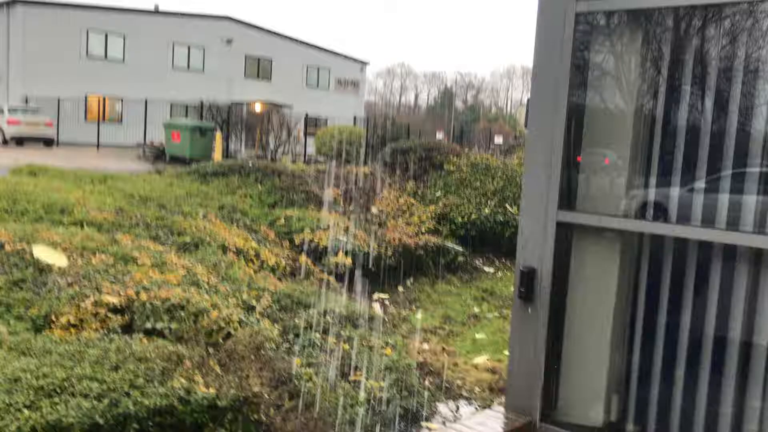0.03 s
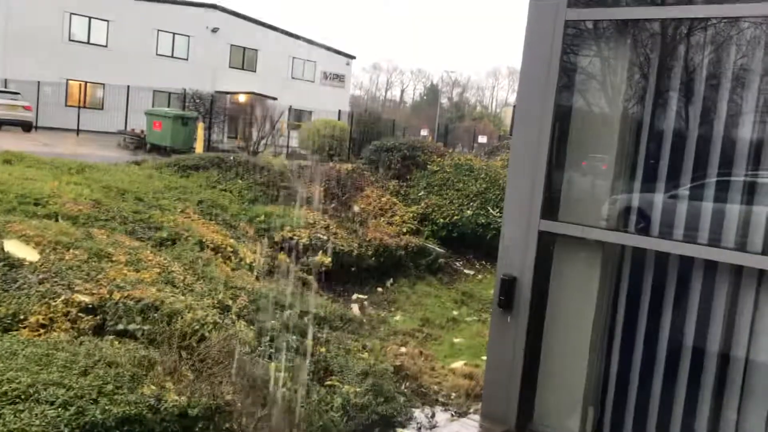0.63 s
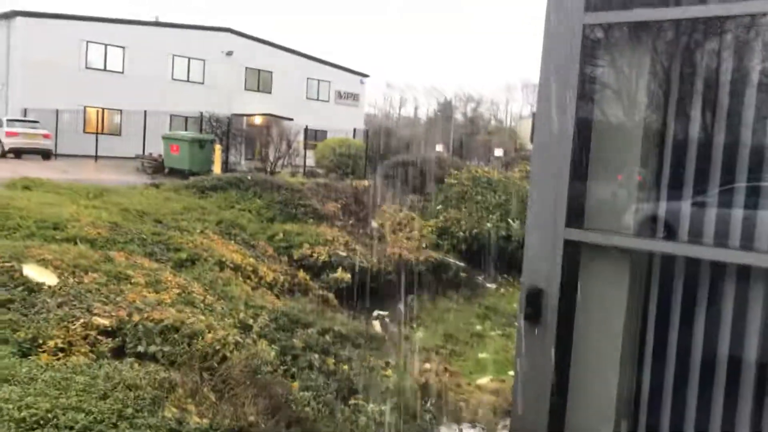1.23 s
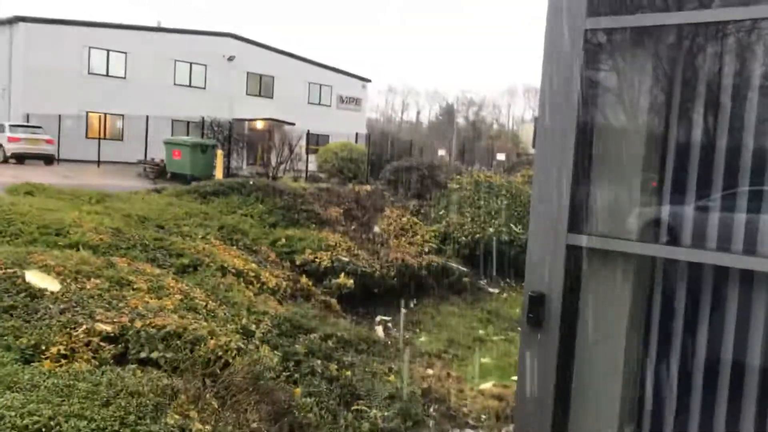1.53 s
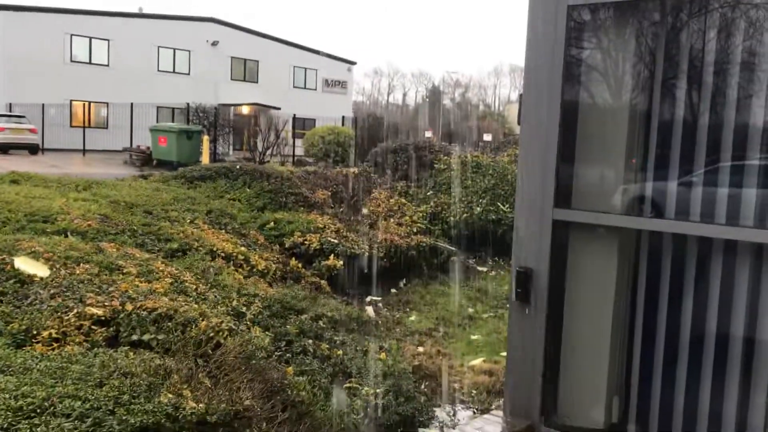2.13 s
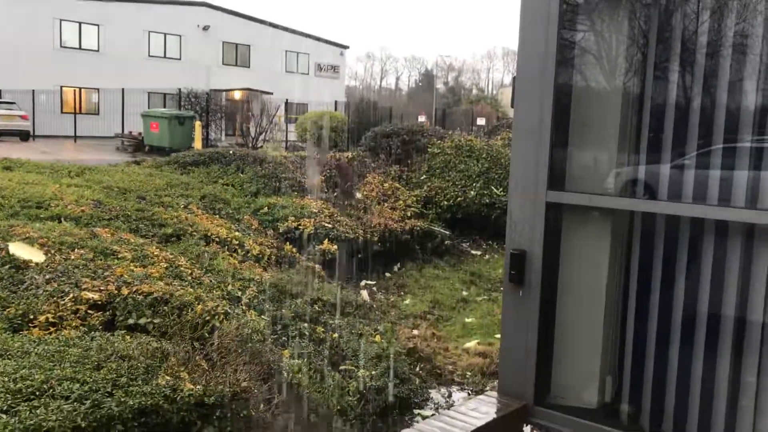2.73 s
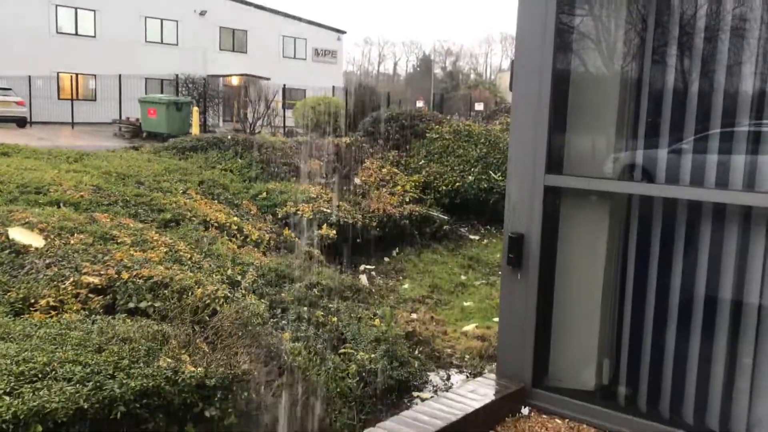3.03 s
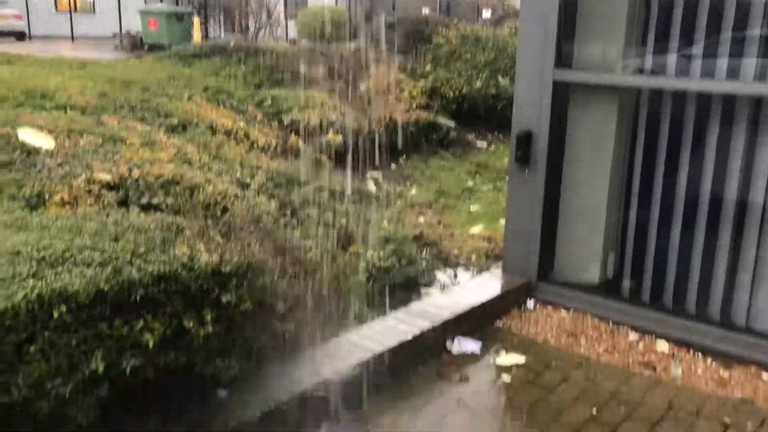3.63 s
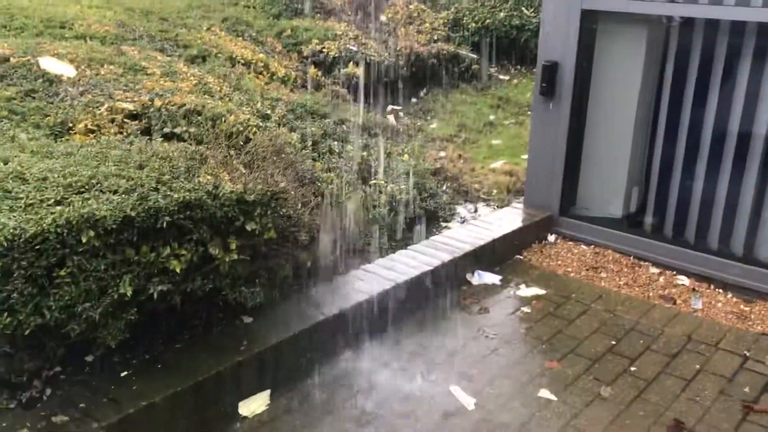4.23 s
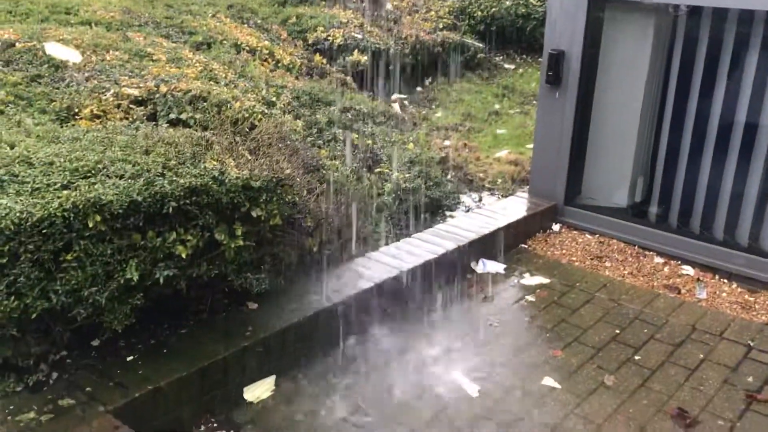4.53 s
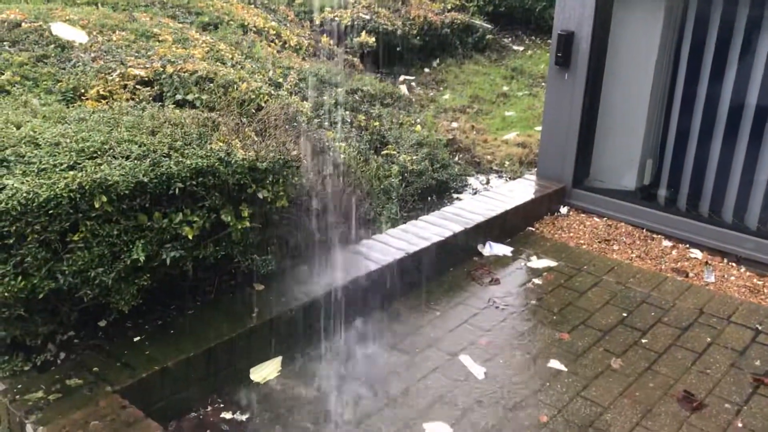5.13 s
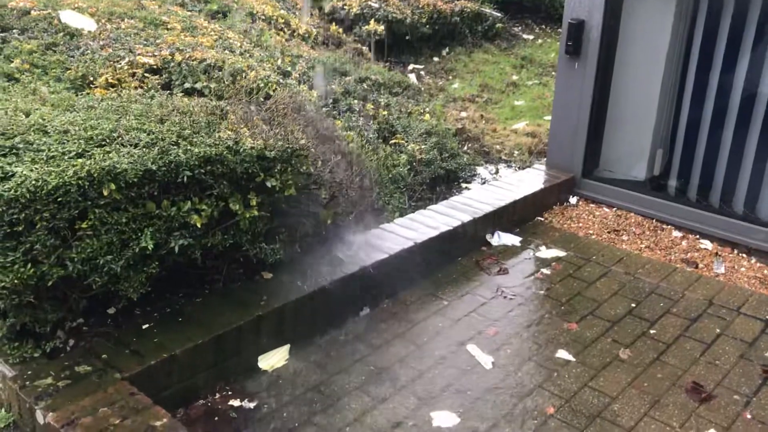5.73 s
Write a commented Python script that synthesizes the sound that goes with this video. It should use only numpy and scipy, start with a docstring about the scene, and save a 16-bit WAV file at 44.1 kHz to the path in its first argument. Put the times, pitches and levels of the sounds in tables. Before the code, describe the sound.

Rainwater spills from an overflowing gutter and splatters on wet paving close to the microphone. Big blobs slap sharply, smaller drops patter in uneven clumps, and fine spray sizzles, with small bubbles plinking in a puddle. A nearby door and wall add a short echo. Steady rain, far traffic and a faint machine hum lie behind. Two soft puffs of wind touch the microphone early on.

```python
"""Rainwater spills from an overflowing gutter onto wet paving beside a glass door.
Big blobs slap, smaller drops patter in clumps, their spray sizzles; door and wall throw it back.
Bubbles ring in the puddle. Behind: steady rain, far traffic, a faint machine hum,
and two early puffs of wind on the microphone."""
import sys
import numpy as np
from scipy import signal
from scipy.fft import rfft, irfft, next_fast_len
from scipy.io import wavfile
from scipy.ndimage import map_coordinates

SR = 44100
rng = np.random.default_rng(int(sys.argv[2]) if len(sys.argv) > 2 else 0)


def transcribe(signal):
    """Save signal, clipped to [-1, 1], as a 16-bit WAV file at the path in sys.argv[1]."""
    frames = np.atleast_2d(signal).T
    limited = np.clip(frames, -1, 1)
    pcm = np.round(limited * 32767).astype(np.int16)
    wavfile.write(sys.argv[1], SR, pcm)


N = 254456

# Gutter flow. Each row: time in seconds, relative spray level in dB.
FLOW = [(.13, -30.5), (.34, -29), (.48, -34.5), (.75, -35), (1.05, -32), (1.5, -31.5), (2.0, -29.5),
        (2.4, -29), (3.08, -31), (3.22, -27.5), (3.75, -29), (4.03, -27.5), (4.15, -29), (4.35, -26.5),
        (4.53, -30), (4.75, -29.5), (5.3, -29.5), (5.77, -34)]
# Thick gushes. Each row: centre in seconds, half length in seconds, patter level in dB.
GUSHES = [(0.872, .06, -36), (1.18, 0.077, -33), (1.475, .025, -31), (1.68, 0.084, -30),
          (1.815, .06, -26.5), (2.067, .06, -30), (2.584, 0.15, -33), (2.93, 0.088, -31),
          (3.223, 0.056, -31.5), (3.36, 0.041, -29.5), (3.8, .17, -36), (4.272, 0.055, -37),
          (4.7, 0.12, -34.5), (5.118, 0.072, -31), (5.412, .03, -33.5)]
# Spectra of finest spray, rain, traffic and wind. Each row: frequency in Hz, relative density in dB.
MIST_SPECTRUM = [(800, -31), (2500, -11), (4500, 4), (6300, 3), (9000, 1), (12500, 2.5), (16000, 2)]
RAIN_SPECTRUM = [(150, -14), (450, -5.5), (650, 0.5), (1000, 1.5), (2000, 0.5), (4000, -5.5), (9000, -7),
                 (16000, -12.5)]
TRAFFIC_SPECTRUM = [(26, -33), (38, -7.5), (60, 0), (85, -5.5), (110, -3), (170, -5), (300, -9), (450, -16),
                    (900, -26.5), (3000, -53)]
WIND_SPECTRUM = [(20, -14), (38, -3), (75, -2), (130, -13), (250, -24), (600, -47)]
# Traffic tones. Each row: centre in seconds, half length in seconds, pitch in Hz, rms level in dB.
DRONES = [(1.7, 0.39, 105, -52), (3.04, 0.59, 66, -50.5), (2.99, 0.11, 360, -54.5), (3.5, 0.21, 117, -52.5),
          (5.3, 0.33, 67, -50.5)]
# Machine tones. Each row: pitch in Hz, mean rms level in dB, wander in Hz.
HUM_TONES = [(63.7, -64, 3.7), (579.5, -59, 0.92)]
# Biggest blobs. Each row: start in seconds, relative level in dB, nominal band centre in Hz.
BIG_BLOBS = [(.1507, -18, 8400), (.4133, -15.5, 6900), (.556, -19.5, 6840), (.7583, -11, 4900),
             (.8258, -12.5, 4970), (.8762, -10, 5700), (.8912, -13.5, 5540), (.9314, -9, 4900),
             (1.0733, -18, 7100), (1.1312, -16.5, 7500), (1.2212, -10, 6240), (1.3598, -14.5, 10700),
             (1.6792, -8, 9400), (1.7881, -11, 6000), (1.8317, -13, 6000), (1.9658, -17, 5400),
             (2.195, -6, 5430), (2.3443, -15, 6750), (2.4997, -12.5, 5850), (2.6478, -9.5, 5630),
             (2.7644, -13, 9700), (2.8181, -14, 4360), (2.946, -8, 4000), (2.9963, -14.5, 3380),
             (3.399, -12, 4470), (3.6005, -11, 7200), (3.6674, -15, 4550), (4.006, -14, 7500),
             (4.0248, -11.5, 6950), (4.0364, -9.5, 6500), (4.1304, -11, 7100), (4.1566, -16, 5170),
             (4.3487, -12, 6900), (4.411, -13, 8200), (4.5767, -12.5, 5100), (4.611, -13, 6300),
             (4.6704, -9, 7700), (4.7761, -9.5, 6000), (4.9073, -10.5, 5430), (5.0018, -16.5, 7350),
             (5.4748, -15, 7700), (5.5245, -8, 5900), (5.589, -11, 5700), (5.636, -12.5, 4950),
             (5.6564, -14, 9650), (5.7532, -15, 6200)]
# Single bubbles. Each row: start in seconds, peak level in dB, starting pitch in Hz.
PLOPS = [(0.239, -21, 3600), (0.514, -16.5, 4100), (2.574, -23, 2980), (4.911, -36, 700), (4.914, -30, 975),
         (5.001, -18.5, 2580), (5.421, -41, 530)]
# Wind puffs. Each row: centre in seconds, half length in seconds, level in dB.
PUFFS = [(0.332, 0.082, -35.5), (0.708, .13, -43.5)]
# Door and wall echoes. Each row: mean delay in seconds, gain in dB.
ECHOES = [(.0064, -12.5), (.0078, -10), (0.0124, -35)]
# Dips in the microphone's response. Each row: centre in Hz, width in Hz, depth in dB.
MIC_DIPS = [(2030, 260, 2), (4940, 274, 3), (7780, 250, 3), (10390, 305, 4)]

USUAL_FLOW_DB, PATTER_DB, PATTER_DB_PER_FLOW_DB = -29.5, -38.7, 1.2
BLOB_BOOST_DB, BLOB_SCATTER_DB, BLOB_NOMINAL_HZ, BLOB_LOG_SPREAD = 12, 1.2, 6900, 0.19
CROWN_DB, CROWN_DECAY_S = -16.5, 0.0058
MIC_OPEN_S, MIC_TOP_HZ = .12, 15800


def amp(db):
    """Decibels to gain."""
    return 10 ** (np.asarray(db) / 20)


def unit(x):
    """Scale to rms 1."""
    return x / np.sqrt(np.mean(x ** 2) + 1e-20)


def wobble(rate_hz):
    """Smooth random curve."""
    knots = rng.standard_normal(int(N * rate_hz / SR) + 4)
    return map_coordinates(knots, [np.arange(N) * rate_hz / SR])


def swell(centre_s, half_s):
    """Flat-topped rise and fall in gain."""
    return np.exp(-.5 * ((np.arange(N) / SR - centre_s) / half_s) ** 4)


def filtered(x, response):
    """Apply a gain given as a function of Hz."""
    size = next_fast_len(N + SR // 4)
    return irfft(rfft(x, size) * response(np.fft.rfftfreq(size, 1 / SR)), size)[:N]


def noise(spectrum):
    """Shaped noise, rms 1."""
    knots_hz, db = np.transpose(spectrum)
    response = lambda hz: amp(np.interp(np.log(hz + 1), np.log(knots_hz), db))
    return unit(filtered(rng.standard_normal(N), response))


def tone(hz, wander_hz):
    """Wavering sine, rms 1."""
    return np.sqrt(2) * np.sin(2 * np.pi * np.cumsum(hz + wander_hz * wobble(14)) / SR)


def place(starts_s, sounds):
    """Sum one sound per row, each at its start."""
    at = np.round(np.abs(starts_s) * SR).astype(int)[:, None] + np.arange(sounds.shape[1])
    return np.bincount(at.ravel(), sounds.ravel(), N)[:N]


def flow_db(times_s):
    """Gutter flow, as relative spray level."""
    return np.interp(times_s, *np.transpose(FLOW))


def pour():
    """Heavy-drop gain: grows faster than the flow; each gush adds its power."""
    steady = amp(PATTER_DB + PATTER_DB_PER_FLOW_DB * (flow_db(np.arange(N) / SR) - USUAL_FLOW_DB))
    gush_power = sum((amp(db) * swell(centre_s, half_s)) ** 2 for centre_s, half_s, db in GUSHES)
    return np.sqrt(steady ** 2 + gush_power)


def impacts(centre_hz, decay_s, width, snap, size=256):
    """Water on stone: pressure spike plus tearing burst, in a band set by drop size."""
    t = np.arange(size) / SR
    shape = np.exp(0.19 * rng.standard_normal((len(centre_hz), 2)))  # no two drops flatten alike
    burst = rng.standard_normal((len(centre_hz), size)) * np.exp(-t / (decay_s * shape[:, :1]))
    burst[:, 0] += snap
    ratio = np.fft.rfftfreq(size, 1 / SR) / centre_hz[:, None]
    band = 1j * ratio / (1 - ratio ** 2 + 1j * ratio * width * shape[:, 1:])
    radiation = 1j * ratio / (0.29 + 1j * ratio)  # small source, little bass
    hits = irfft(rfft(burst) * band * radiation, size)
    return hits / np.linalg.norm(hits, axis=1, keepdims=True) * np.sqrt(SR / 1000)  # 1 ms at rms 1


def shower(count, centre_hz, log_spread, range_db, decay_s, width, snap):
    """Random drops, the bigger ones louder and duller; rms 1."""
    when, bigness = rng.random((count, 2)).T
    hz = centre_hz * np.exp(log_spread * (rng.standard_normal(count) - bigness + .5))
    drops = amp(range_db * bigness ** 2)[:, None] * impacts(hz, decay_s, width, snap)
    return unit(place(when * N / SR, drops))


def splatter():
    """The broken stream lands in clumps: drops patter, thrown droplets sizzle."""
    spray_db = flow_db(np.arange(N) / SR) + 0.5 * wobble(14)
    clumps = wobble(65)
    patter = shower(count=1500, centre_hz=4350, log_spread=0.22, range_db=8.5,
                    decay_s=0.00053, width=0.75, snap=1.15)
    spray = shower(count=6500, centre_hz=9450, log_spread=0.27, range_db=15.5,
                   decay_s=0.0003, width=0.44, snap=1.43)
    sizzle = spray + amp(-3.5) * noise(MIST_SPECTRUM)
    return pour() * amp(1.7 * clumps) * patter + amp(spray_db - 0.5 + 2.04 * clumps) * sizzle


def rain():
    """Steady hiss of rain on hedges."""
    return amp(-40 + 0.83 * wobble(6.6)) * noise(RAIN_SPECTRUM)


def traffic():
    """Far rumble; low tones swell and fade in it."""
    rumble = amp(-46.5 + 0.81 * wobble(10)) * noise(TRAFFIC_SPECTRUM)
    return rumble + sum(amp(db) * swell(centre_s, half_s) * tone(hz, wander_hz=1.58)
                        for centre_s, half_s, hz, db in DRONES)


def machine_hum():
    """Distant machine, wavering in pitch and level."""
    return sum(amp(db + 2.4 * wobble(6)) * tone(hz, wander_hz) for hz, db, wander_hz in HUM_TONES)


def lesser_blobs(count=56):
    """Blobs tear off the gutter's lip at loose intervals, bigger with more flow. Rows as BIG_BLOBS."""
    starts_s = (np.arange(count) + rng.random(count)) / count * N / SR
    weight, pitch = rng.standard_normal((count, 2)).T
    db = flow_db(starts_s) + BLOB_BOOST_DB + BLOB_SCATTER_DB * np.minimum(weight, 1)
    return np.column_stack([starts_s, db, BLOB_NOMINAL_HZ * np.exp(BLOB_LOG_SPREAD * pitch)])


def slaps():
    """Each blob cracks on the paving; its crown of droplets falls back."""
    starts_s, db, nominal_hz = np.vstack([BIG_BLOBS, lesser_blobs()]).T
    cracks = amp(db - 1.6)[:, None] * impacts(nominal_hz * .85, decay_s=.0006, width=.92, snap=1.6)
    t = np.arange(SR // 20) / SR
    crown_gain = place(starts_s, amp(db + CROWN_DB)[:, None] * np.exp(-t / CROWN_DECAY_S))
    droplets = shower(count=4000, centre_hz=5760, log_spread=0.25, range_db=8,
                      decay_s=0.00036, width=0.69, snap=0.69)
    return place(starts_s, cracks) + crown_gain * droplets


def bubbles(db, hz, rise_cycles, glide, size=1600):
    """Bubbles ring briefly, rising in pitch as they reach the surface."""
    t = np.arange(size) / SR
    age = t * hz[:, None] / rise_cycles
    phase = 2 * np.pi * hz[:, None] * t * (1 + glide * np.minimum(age, 10) / 2)
    return amp(db)[:, None] * age * np.exp(1 - age) * np.sin(phase)


def puddle(count=240):
    """A few plops among many small bubbles; the small ones grow louder with the flow."""
    starts_s, db, hz = np.transpose(PLOPS)
    plops = place(starts_s, bubbles(db, hz, rise_cycles=2.1, glide=0.087))
    when, pitch, size = rng.random((count, 3)).T
    small = bubbles(db=-16 + 13 * pitch + 10 * size ** 2, hz=1700 * 4 ** pitch, rise_cycles=2, glide=.04)
    return plops + amp(-4) * pour() * place(when * N / SR, small)


def wind():
    """Fluttering puffs buffet the microphone."""
    puffs = sum(amp(db) * swell(centre_s, half_s) for centre_s, half_s, db in PUFFS)
    return puffs * amp(2.3 * wobble(24.4)) * noise(WIND_SPECTRUM)


def yard(x, rt60_s=0.33, block=4096):
    """Door and wall echoes, plus a short, smooth diffuse tail, drawn afresh for each block."""
    t = np.arange(SR // 5) / SR
    blocks = np.pad(x, (0, -N % block)).reshape(-1, block)
    envelope = amp(-60 * t / rt60_s) * (1 - np.exp(-t / 0.00067))
    tails = rng.standard_normal((len(blocks), len(t))) * envelope
    wet = signal.fftconvolve(blocks, tails / np.linalg.norm(tails[0]), axes=1)
    out = x + amp(-8.5) * place(np.arange(len(blocks)) * block / SR, wet)
    for delay_s, db in ECHOES:
        lag = np.round((delay_s + .0004 * wobble(25)) * SR).astype(int)  # the stream sways
        out += amp(db) * x[np.clip(np.arange(N) - lag, 0, N - 1)]
    return out


def scene():
    """The overflow in its yard, over the background; mono."""
    overflow = yard(slaps() + splatter() + puddle())
    return (overflow + rain() + traffic() + machine_hum() + wind())[None]


def record(dry):
    """Microphone: opens just after the start, notches the treble, rounds peaks, limits the band."""
    def dips(hz):
        return amp(-sum(db * np.exp(-.5 * ((hz - centre_hz) / width_hz) ** 2)
                        for centre_hz, width_hz, db in MIC_DIPS))
    live = filtered(dry[0], dips) * (np.arange(N) / SR >= MIC_OPEN_S)
    rounded = live / (1 + (live / .85) ** 4) ** .25
    return filtered(rounded, lambda hz: np.clip((MIC_TOP_HZ - hz) / 200 + .5, 0, 1))[None]


dry = scene()
out = record(dry)
transcribe(out)
```